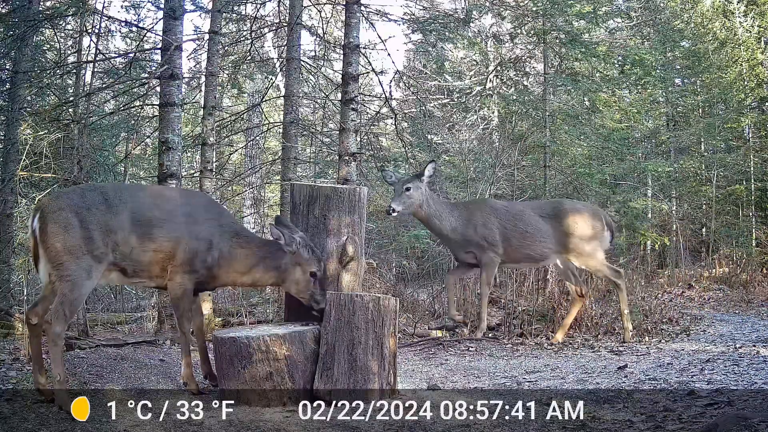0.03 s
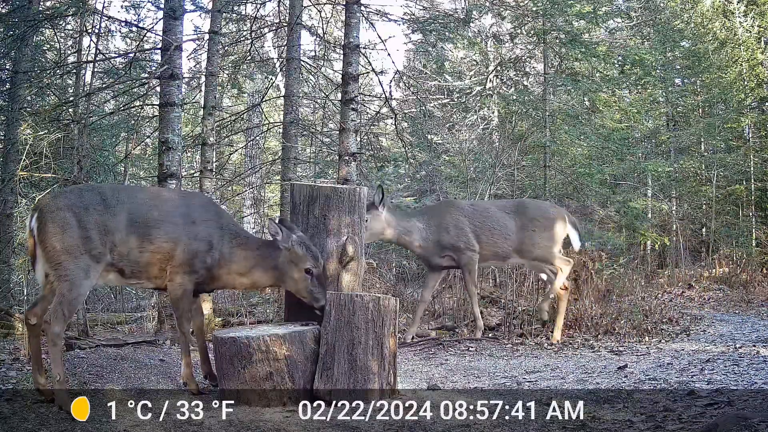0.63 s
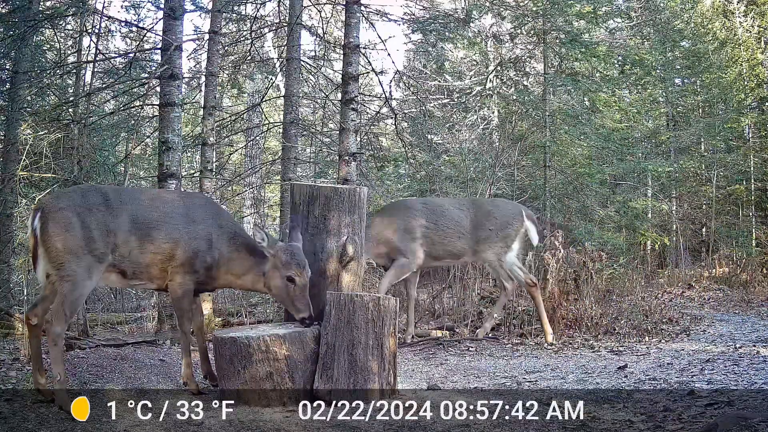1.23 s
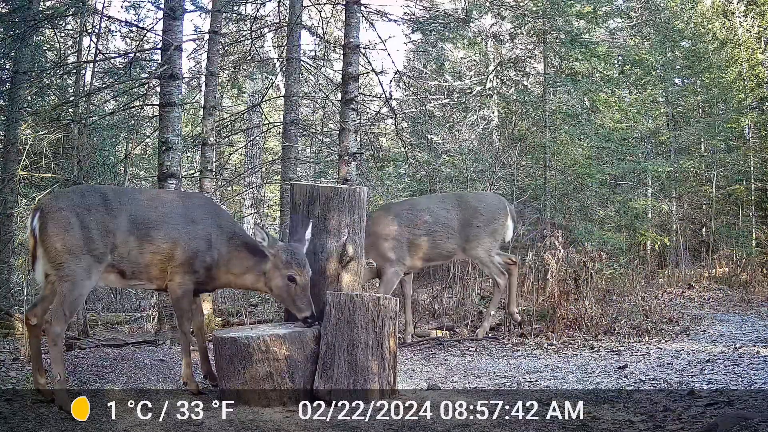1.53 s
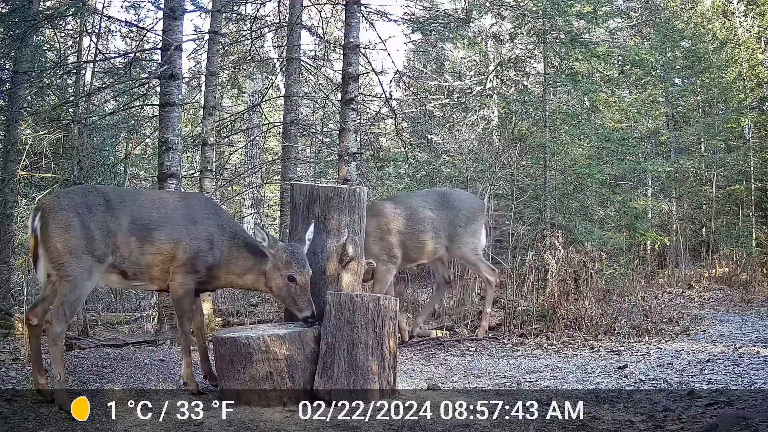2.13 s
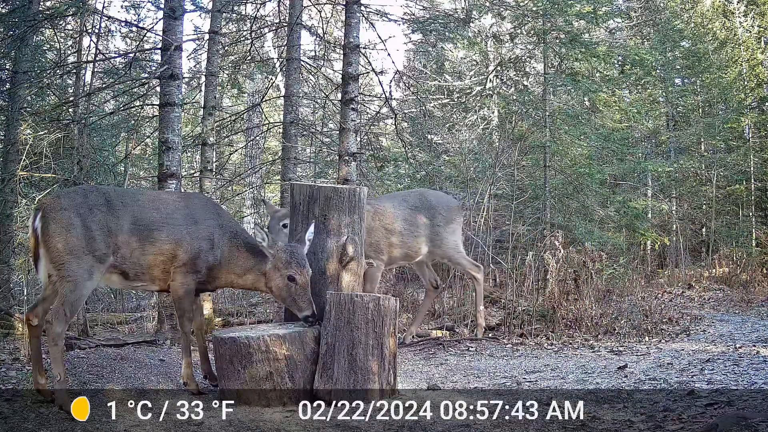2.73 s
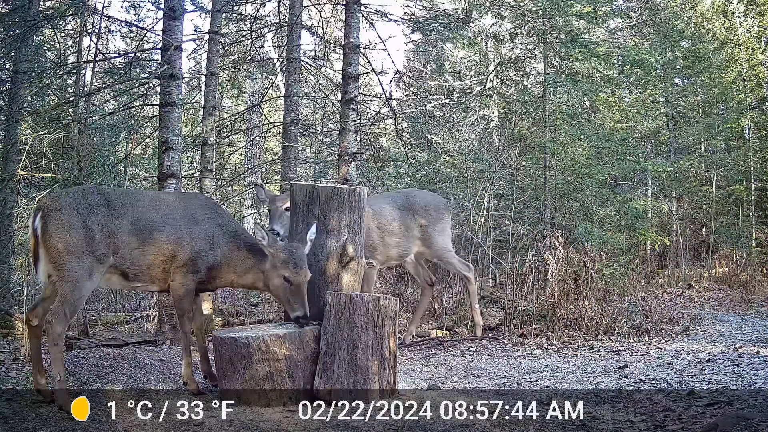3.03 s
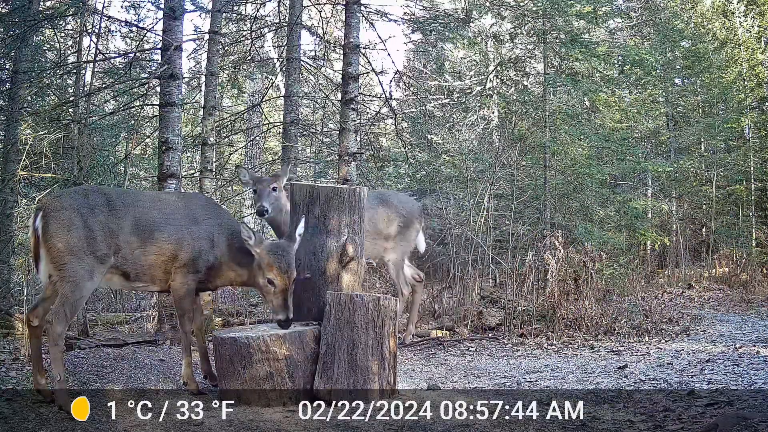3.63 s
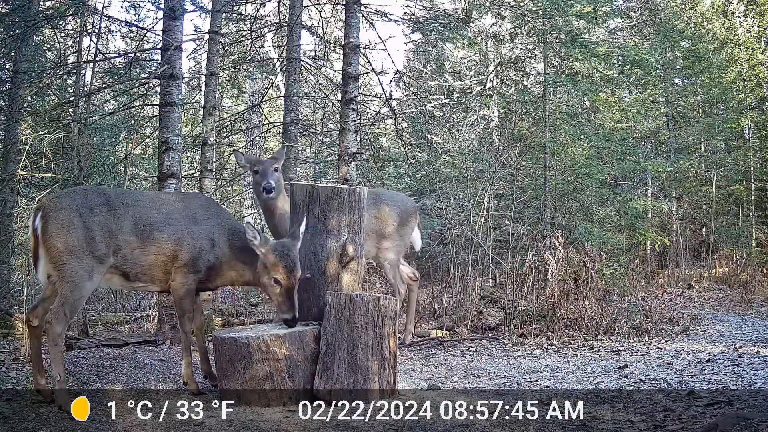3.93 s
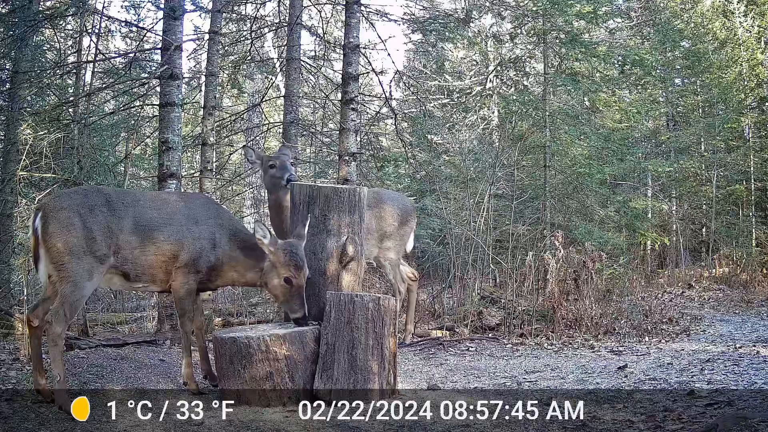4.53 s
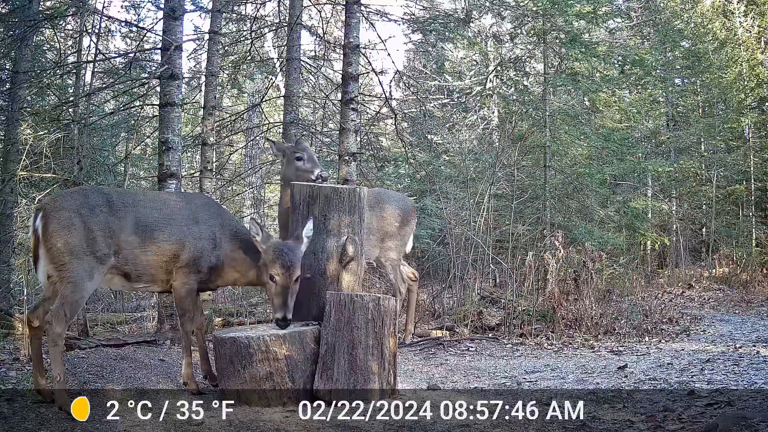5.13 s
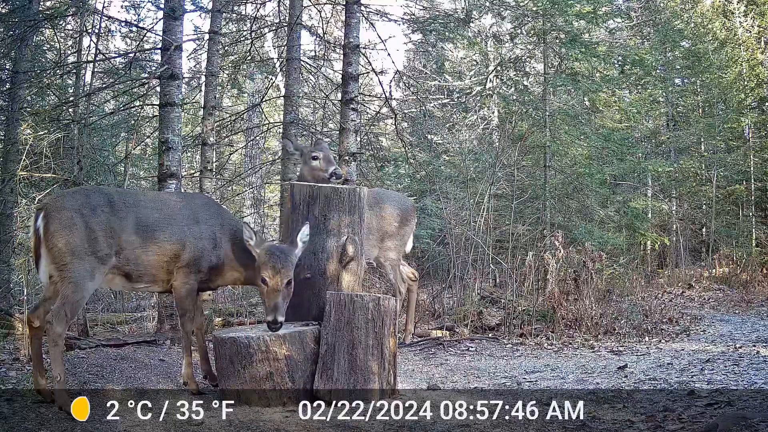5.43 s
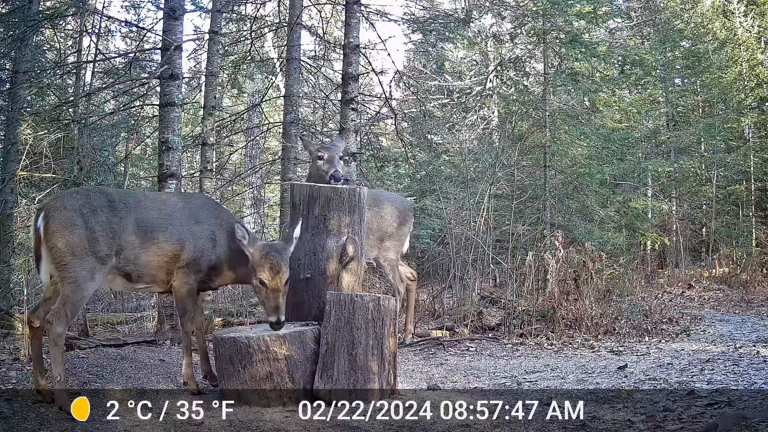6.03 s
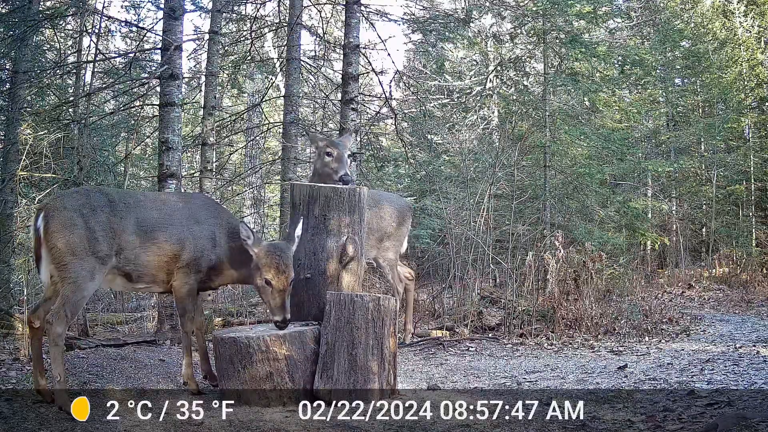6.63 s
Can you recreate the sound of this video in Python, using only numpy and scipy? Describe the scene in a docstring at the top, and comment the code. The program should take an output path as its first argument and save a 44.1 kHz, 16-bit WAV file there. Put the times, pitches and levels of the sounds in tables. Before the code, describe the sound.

Harsh jay calls echo through a forest clearing while deer faintly snap twigs and scuff the ground over a low outdoor rumble.

```python
"""A jay screams twice far off, then five times close by, in the trees around a clearing where two deer feed.
The two sides of its syrinx sing near a 2:3 ratio and slip against each other, which makes the harsh
edge; the forest echoes each call. Twigs and dry litter snap under the deer and their hooves scuff.
Behind them lie soft thuds, a low outdoor rumble, a quiet hiss and a distant drone.
The microphone is a trail camera's: mono, on the left channel only."""
import sys
import numpy as np
from scipy import signal
from scipy.fft import rfft, irfft
from scipy.io import wavfile

SR = 44100
rng = np.random.default_rng(int(sys.argv[2]) if len(sys.argv) > 2 else 0)


def output_pcm(signal):
    """Save a mono or channel-first signal as 16-bit PCM at the path in sys.argv[1].

    Samples are clipped to [-1, 1] before scaling.
    """
    pcm = np.clip(np.atleast_2d(signal).T, -1, 1) * 32767
    wavfile.write(sys.argv[1], SR, np.round(pcm).astype(np.int16))


N = 299439
TIME = np.arange(N) / SR

# The jay in the trees: two calls far from the microphone, then five near; levels are for the held part.
# start_s, length_s, low_hz, scoop_hz, slide_hz_per_s, sag_hz, high_hz, high_sag_hz,
# low_db, swell_db, high_db, octave_db, shrill_db, flare_db, flare_s (after the start)
JAY_CALLS = [ (0.588, 0.3, 1773, 100, 510, 29, 2615, 25, -88, 2, -79, -83, -100, -100, .2),
             (1.301, 0.3, 1710, 101, 320, 15, 2600, 25, -83, 0, -83, -87, -100, -100, 0.18),
             (2.951, 0.2986, 1695, 250, 6.4, 109, 2579, 76, -45.5, 3, -46, -56.5, -71.5, -71.5, 0.24),
             (3.601, 0.3, 1753, 343.6, 500, 16.6, 2601, 33.6, -45, 1.5, -47.5, -58.5, -66, -61.5, 0.24),
             (5.048, 0.28, 1707, 150.5, 140, 91, 2614, 65, -45, 6.5, -44.5, -54, -62.5, -56, .18),
             (5.652, 0.3, 1751, 139.7, 330, 15, 2639, 2.5, -43, 4.5, -44.5, -54.5, -60.5, -63.5, 0.25),
             (6.58, 0.39, 1710, 115.6, 80, 125, 2641, 40, -42.5, 5, -45.5, -60, -65.5, -69, 0.21), ]


def jay_call(start_s, length_s, low_hz, scoop_hz, slide_hz_per_s, sag_hz, high_hz, high_sag_hz,
             low_db, swell_db, high_db, octave_db, shrill_db, flare_db, flare_s,
             attack_s=.005, release_s=.0038, grow_s=.13, flat_hz=69.4, scoop_db_per_hz=-.0134):
    """One scream: the low voice scoops up, the high one grows in, and both sag as the breath runs out."""
    t = np.arange(0, length_s + 5 * release_s, 1 / SR)
    scoop = 1 - step(t, at_s=.0135, width_s=.0025)
    sag = step(t, at_s=.232, width_s=.012)
    weak = np.maximum(1 - t / grow_s, 0)  # the high voice starts soft and flat
    swell = bump(t, at_s=.201, width_s=.033)  # the low voice swells while the high one yields
    low_stop_db = -20 / np.log(10) * np.maximum(t - length_s + .008, 0) / release_s  # stops 8 ms early
    ring_db = -13.5 * scoop + 4.5 * bump(t, at_s=.036, width_s=.018)  # the octave rings after the scoop
    # the shrill overtones open once the high voice is strong, flash, and flash again as the pitch sags
    shut = 1 - step(t, at_s=.096, width_s=.0058)
    open_db = -21.5 * shut - 6.5 * sag
    open_db += 5 * bump(t, at_s=.14, width_s=.015) + 6.5 * bump(t, at_s=.232, width_s=.015)
    # the sum tone rests below the low voice, with a brief early flash and one later flare
    flash = bump(t, at_s=.077, width_s=.011)
    sum_tone = gain_of(low_db) * (gain_of(-34) * (1 - weak) + gain_of(-26) * flash)
    sum_tone += gain_of(flare_db) * bump(t, at_s=flare_s, width_s=.027)
    sound = syrinx(
        low_hz=low_hz - scoop_hz * scoop - slide_hz_per_s * t - sag_hz * sag,
        high_hz=high_hz - flat_hz * weak - high_sag_hz * sag,
        low_db=low_db + scoop_db_per_hz * scoop_hz * scoop + swell_db * swell - sag + low_stop_db,
        high_db=high_db - 18 * scoop - 18 * weak - 1.5 * swell + 2.5 * sag,
        octave_db=octave_db + ring_db,
        shrill_db=shrill_db + open_db,
        sum_db=20 * np.log10(sum_tone + 1e-12))
    envelope = np.minimum(t / attack_s, 1) * np.exp(-np.maximum(t - length_s, 0) / release_s)
    return start_s, sound * envelope


# Side tones where the two voices clash, strongest in the near calls: low_multiple, high_multiple
SIDE_TONES = [(-3, 3), (-4, 3), (-1, 1), (-1, 2), (-2, 3), (4, -1), (4, -2), (-2, 2), (6, -3)]
# Each side tone against the high voice at full strain: level_db
SIDE_TONE_DB = [-20.5, -29.5, -30.5, -24, -28, -36, -28, -25, -29.5]
# Shrill overtones at the top of the scream: low_multiple, high_multiple
SHRILL_TONES = [(0, 2), (3, 0), (2, 1)]
# Each overtone against the call's shrill level: level_db
SHRILL_TONE_DB = [-4, -7, -22]


def syrinx(low_hz, high_hz, low_db, high_db, octave_db, shrill_db, sum_db,
           full_strain_db=-44, coupling=.49, lock_hz=140, flutter_db=3.5):
    """Two coupled whistles with sum and difference tones; a louder high voice makes a rougher call."""
    size = len(low_hz)

    def wobble(width_hz):
        """A random quiver of rms 1."""
        return band(size, 0, width_hz)

    strain = np.minimum(gain_of(high_db - full_strain_db), 1)  # 0 smooth, 1 harsh
    mistuning_hz = 2 * high_hz - 3 * low_hz  # zero at a 2:3 ratio
    pull = np.sqrt(strain) * coupling / (1 + (mistuning_hz / lock_hz) ** 2)
    low = membrane(low_hz, jitter=.0045, jitter_hz=240)
    high = membrane(high_hz, jitter=.005 + .02 * pull, jitter_hz=200)
    slip = 2 * high - 3 * low  # this phase turns whenever the voices leave that ratio
    voices = gain_of(low_db) * np.sin(low) * (1 + .07 * wobble(160))
    # the pull splits the high voice and shakes the overtones
    split = np.sin(high) * (1 + .13 * wobble(140)) + pull * np.sin(high - slip + .6 * wobble(80))
    voices += gain_of(high_db) * split
    octave_gain = gain_of(octave_db + flutter_db * wobble(130))
    voices += octave_gain * np.sin(2 * low + pull * (np.sin(slip) + wobble(200)))
    voices += gain_of(sum_db + flutter_db * wobble(90)) * np.sin(low + high)
    for (a, b), db in zip(SIDE_TONES, SIDE_TONE_DB):
        voices += strain * gain_of(high_db + db) * np.sin(a * low + b * high)
    for (a, b), db in zip(SHRILL_TONES, SHRILL_TONE_DB):
        shrill_gain = gain_of(shrill_db + db + flutter_db * wobble(110))
        voices += shrill_gain * np.sin(a * low + b * high + 2 * pull * wobble(240))
    rasp = gain_of(high_db - 34) * band(size, hz=1900, width_hz=1400)  # air rushing through the throat
    rasp += gain_of(high_db - 30) * band(size, hz=800, width_hz=340)  # a hoarse undertone
    rasp += gain_of(high_db - 33) * band(size, hz=6200, width_hz=900)  # a faint fizz on top
    return np.sqrt(2) * voices + rasp


def membrane(hz, jitter, jitter_hz):
    """Phase of one side of the syrinx, whose pitch trembles."""
    trembling_hz = hz * (1 + jitter * band(len(hz), 0, jitter_hz))
    return 2 * np.pi * np.cumsum(trembling_hz) / SR


# Twigs and dry litter under the deer in the clearing: start_s, level_db, centre_hz, width_hz, t60_s
TWIG_SNAPS = [(0.181, -46, 7050, 900, 0.041), (.186, -61.5, 4530, 1200, .04), (.3, -48.5, 2970, 700, 0.019),
              (0.825, -45.5, 3600, 1000, 0.027), (.919, -60, 3880, 1000, 0.054),
              (1.027, -45.5, 3500, 1100, 0.015), (1.037, -48, 6400, 700, 0.04),
              (1.042, -59, 3840, 1200, 0.12), (1.452, -51, 6350, 1100, 0.018),
              (1.555, -47, 3260, 1700, 0.015), (2.229, -40, 3660, 747, 0.015),
              (4.662, -64.5, 4200, 2000, 0.046), (5.618, -55, 3750, 1300, 0.027),
              (6.364, -55.5, 4730, 3500, 0.027)]


def twig_snap(start_s, level_db, centre_hz, width_hz, t60_s, rise_s=.0013):
    """A short burst of breaking fibres in one woody resonance."""
    t = np.arange(SR // 6) / SR
    envelope = gain_of(-60 * t / t60_s) * (1 - np.exp(-t / rise_s))
    burst = band(len(t), centre_hz, width_hz) * envelope
    return start_s, gain_of(level_db) * burst * np.linalg.norm(envelope) / np.linalg.norm(burst)


# Hooves on the floor of the clearing, before the near calls: time_s, level_db
SCUFF_LEVELS = [(1.1, -82), (1.33, -64), (1.5, -76), (1.9, -90), (1.975, -56.5), (2.03, -61.5), (2.1, -63),
                (2.18, -72), (2.4, -95)]
# The colour of the scuffing at the microphone: frequency_hz, density_db
SCUFF_SPECTRUM = [(120, -7.5), (230, 12), (350, 4), (700, -2), (1100, -0.5), (1600, -11.5), (2700, -23),
                  (3700, -7.5), (4600, -24.5), (8000, -30.5)]


def hoof_scuff(grain_db=3):
    """Hooves dragged through grainy ground: noise whose level flickers."""
    flicker_db = grain_db * band(N, 0, width_hz=150)
    level_db = np.interp(TIME, *np.transpose(SCUFF_LEVELS))
    return coloured(SCUFF_SPECTRUM) * gain_of(level_db + flicker_db)


# Soft low thuds at the microphone, without echo: middle_s, level_db, pitch_hz
LOW_THUDS = [(.103, -47, 95.6), (.368, -44.5, 111.6), (1.042, -45.5, 70), (1.322, -46.5, 84.4),
             (1.532, -42.5, 88), (1.876, -48, 70), (2.075, -45, 90.4), (2.911, -49, 134), (3.459, -46, 121),
             (3.93, -45, 66.7), (4.41, -46, 115), (5.335, -46, 108), (5.96, -46, 78.2), (6.446, -52.5, 93)]


def thud(middle_s, level_db, pitch_hz, length_s=.0561):
    """A few soft cycles of low pressure."""
    t = np.arange(0, length_s, 1 / SR)
    envelope = np.sin(np.pi * t / length_s) ** 2
    tone = np.sin(2 * np.pi * (pitch_hz * t + rng.random()))
    return middle_s - length_s / 2, gain_of(level_db) * envelope * tone


# How long the surrounding forest rings: frequency_hz, t60_s
FOREST_DECAY = [(500, 0.33), (1700, 0.72), (2600, 0.74), (4000, 1), (7000, 0.42)]
# Echoes off trunks and the edge of the clearing, nearest first: delay_s, level_db
TRUNK_ECHOES = [(.009, -24.5), (.021, -13), (0.045, -33), (.083, -25), (.112, -22.5)]


def forest_echo(sound, scatter_db=-16, build_s=.025, taps_per_s=2000):
    """A diffuse tail scattered by the trees, and a few distinct echoes, each up to 3% late."""
    taps = rng.standard_normal(SR) * (rng.random(SR) < taps_per_s / SR)
    hz, t, spectrum = signal.stft(taps, SR, nperseg=256)
    decay = gain_of(-60 * t / read(FOREST_DECAY, hz)[:, None])
    build = 1 - np.exp(-t / build_s)
    tail = signal.istft(spectrum * decay * build, SR, nperseg=256)[1]
    tail *= gain_of(scatter_db) / np.linalg.norm(tail)
    for delay_s, level_db in TRUNK_ECHOES:
        add(tail, delay_s * rng.uniform(1, 1.03), gain_of([level_db]))
    return signal.fftconvolve(sound, tail)[:N]


# The open air all around the microphone: frequency_hz, density_db
AIR_SPECTRUM = [(12, -38.5), (20, -10), (54, 2), (87, -4), (120, -2), (157, -7.5), (259, -12), (376, -18.5),
                (559, -20), (617, -20), (896, -22), (1550, -27.5), (2680, -29), (6710, -34.5),
                (7600, -39.5), (9880, -80.5), (16700, -120)]


def outdoor_air(level_db=-56, swell_db=.42):
    """Low rumble and quiet hiss that barely swell."""
    return gain_of(level_db - swell_db * band(N, 0, width_hz=2.6)) * coloured(AIR_SPECTRUM)


# A drone far from the clearing, loudest late in the scene: time_s, level_db
DRONE_LEVELS = [(0, -76.5), (2.5, -67), (4.3, -63), (5.4, -56.5), (6.1, -65), (6.79, -59)]


def far_drone(whine_db=-14):
    """A low hum and a fainter whine above it, each a narrow band of noise."""
    hum = band(N, hz=114, width_hz=12)
    whine = gain_of(whine_db) * band(N, hz=272, width_hz=16)
    return gain_of(np.interp(TIME, *np.transpose(DRONE_LEVELS))) * (hum + whine)


def gain_of(db):
    """Decibels to amplitude."""
    return 10 ** (np.asarray(db) / 20)


def unit_rms(x):
    """Scales to rms 1."""
    return x / np.sqrt(np.mean(x ** 2) + 1e-20)


def read(points, hz):
    """Reads a table on a log-frequency axis."""
    f, value = np.transpose(points)
    return np.interp(np.log(hz + 1), np.log(f + 1), value)


def add(mix, start_s, sound):
    """Mixes a sound in at the given time."""
    part = mix[max(round(start_s * SR), 0):][:len(sound)]
    part += sound[:len(part)]


def coloured(points):
    """Noise with the given spectrum, rms 1."""
    shape = gain_of(read(points, np.fft.rfftfreq(N, 1 / SR)))
    return unit_rms(irfft(rfft(rng.standard_normal(N)) * shape, N))


def band(size, hz, width_hz):
    """Noise in one steep-sided resonance, rms 1; around 0 Hz it is a slow wobble."""
    detuning = 2 * (np.fft.rfftfreq(size, 1 / SR) - hz) / width_hz
    return unit_rms(irfft(rfft(rng.standard_normal(size)) / (1 + detuning ** 2), size))


def step(t, at_s, width_s):
    """A smooth rise from 0 to 1 around the given time."""
    return .5 + .5 * np.tanh((t - at_s) / (2 * width_s))


def bump(t, at_s, width_s):
    """A smooth hump of height 1 around the given time."""
    return np.exp(-((t - at_s) / width_s) ** 2)


def scene(mic_gain=2):
    """The jay in the trees, deer on the ground and the air around them, all at one microphone."""
    jay, twigs, thuds = np.zeros((3, N))
    for row in JAY_CALLS:
        add(jay, *jay_call(*row))
    for row in TWIG_SNAPS:
        add(twigs, *twig_snap(*row))
    for row in LOW_THUDS:
        add(thuds, *thud(*row))
    echoes = forest_echo(jay + gain_of(-2.5) * twigs)
    mono = jay + twigs + echoes + thuds + hoof_scuff() + outdoor_air() + far_drone()
    return np.array([mic_gain * mono, np.zeros(N)])  # the microphone feeds only the left channel


def record(dry):
    """The trail camera's narrow band: a steep cut of the high treble."""
    edge_hz = 7800
    lowpass = signal.firwin(401, edge_hz, window=("kaiser", 8), fs=SR)
    return signal.oaconvolve(dry, lowpass[None], "same")


dry = scene()
out = record(dry)
output_pcm(out)
```